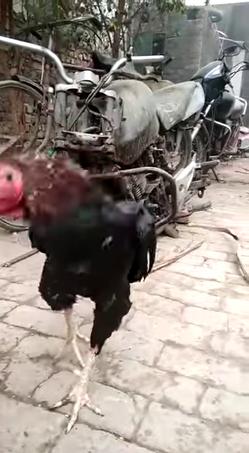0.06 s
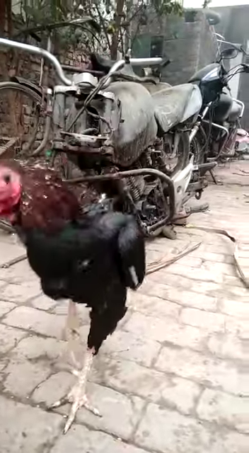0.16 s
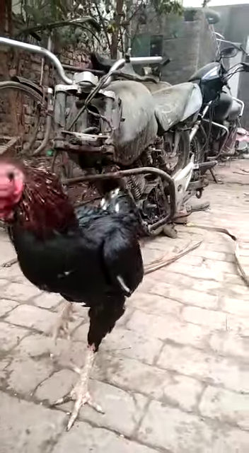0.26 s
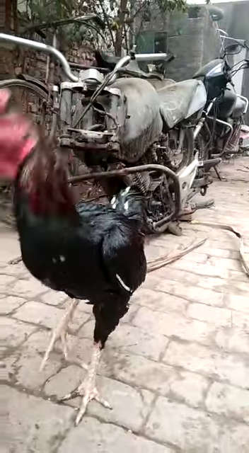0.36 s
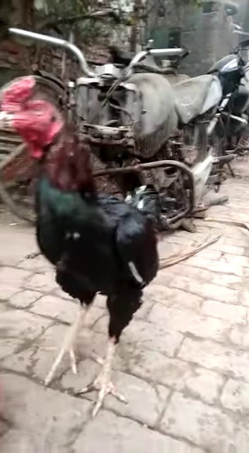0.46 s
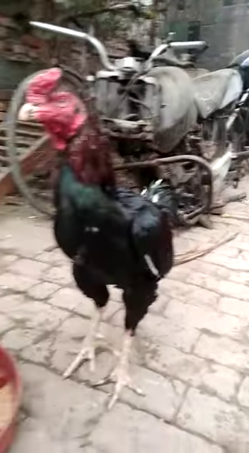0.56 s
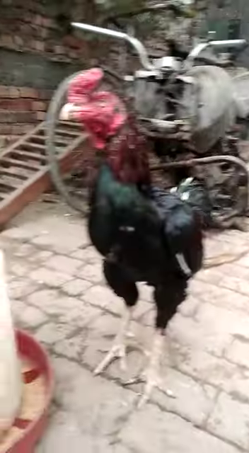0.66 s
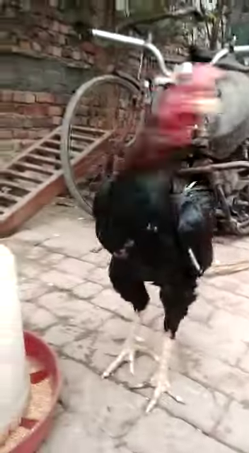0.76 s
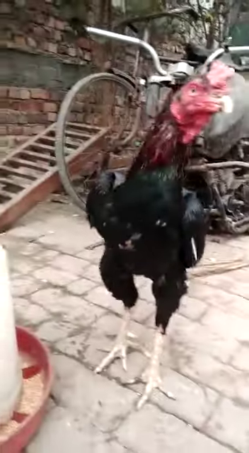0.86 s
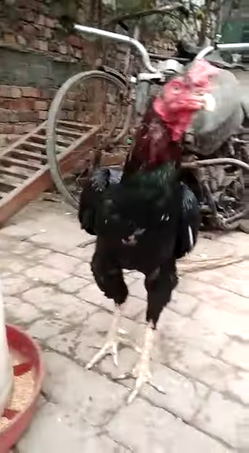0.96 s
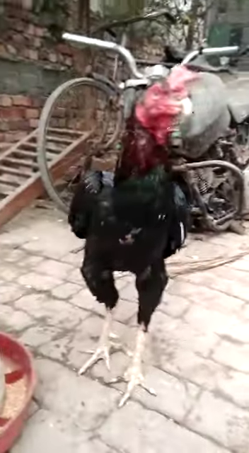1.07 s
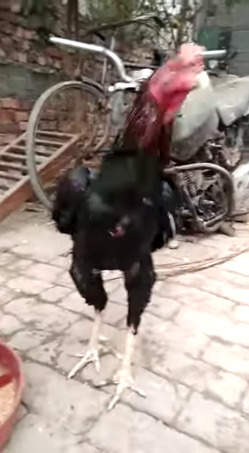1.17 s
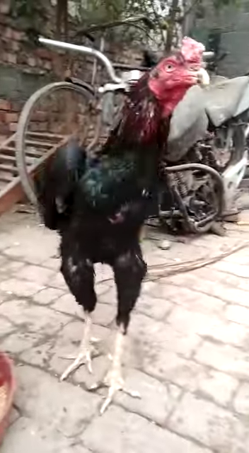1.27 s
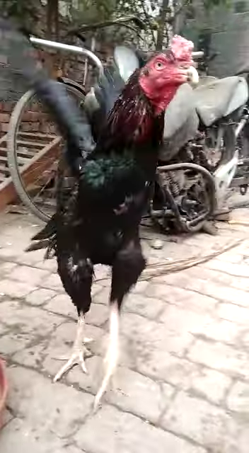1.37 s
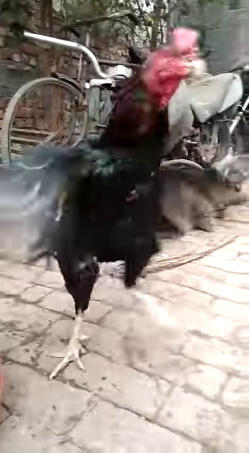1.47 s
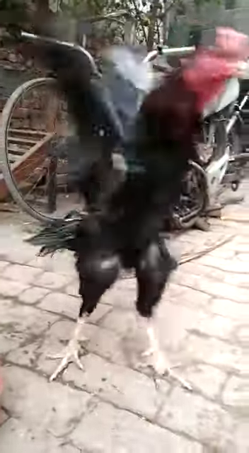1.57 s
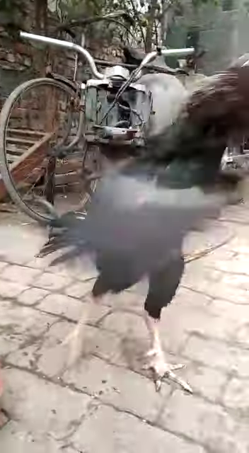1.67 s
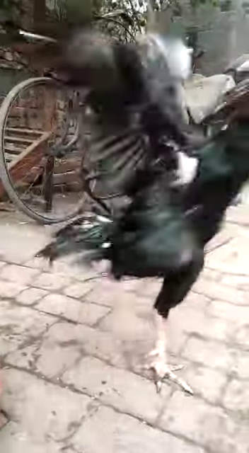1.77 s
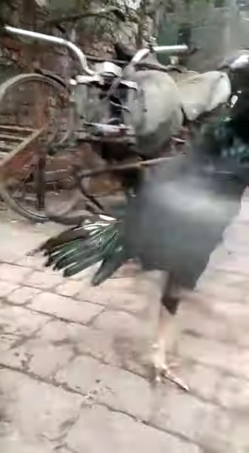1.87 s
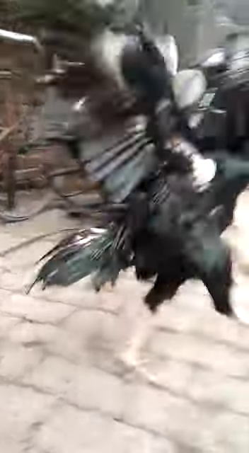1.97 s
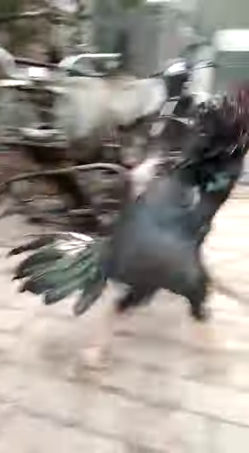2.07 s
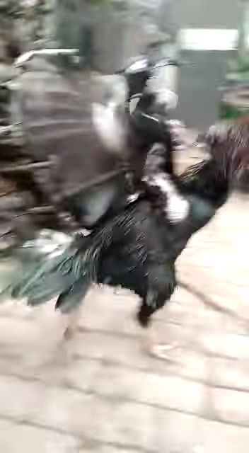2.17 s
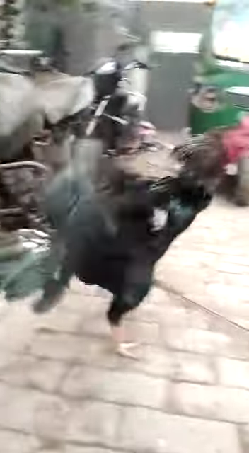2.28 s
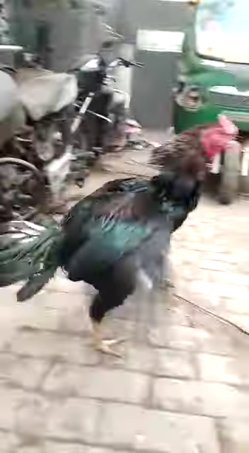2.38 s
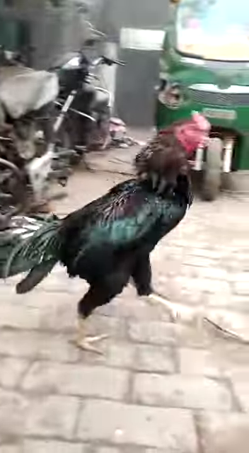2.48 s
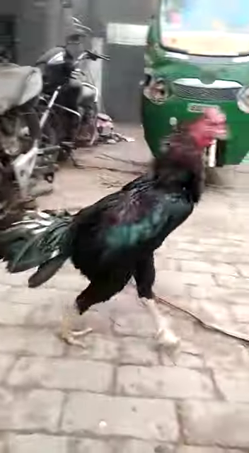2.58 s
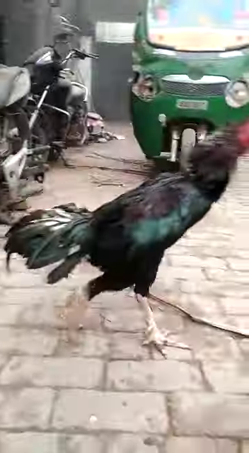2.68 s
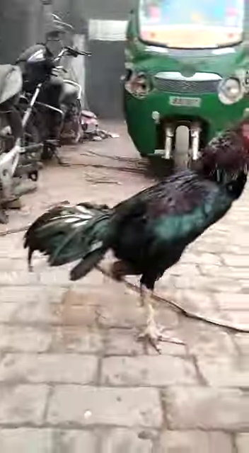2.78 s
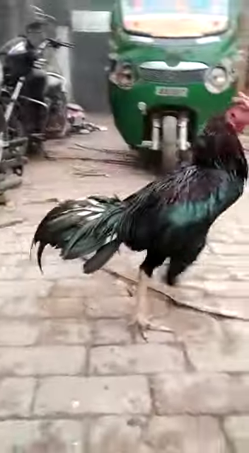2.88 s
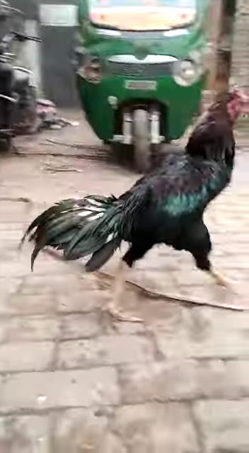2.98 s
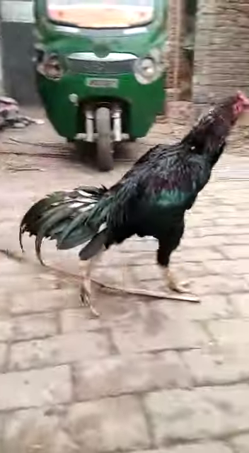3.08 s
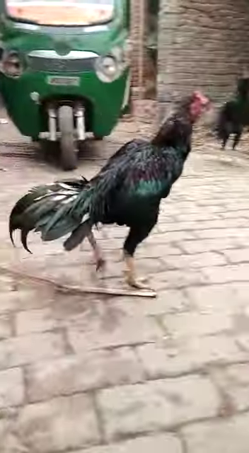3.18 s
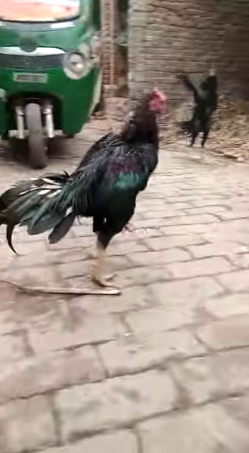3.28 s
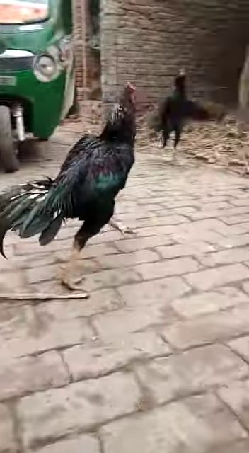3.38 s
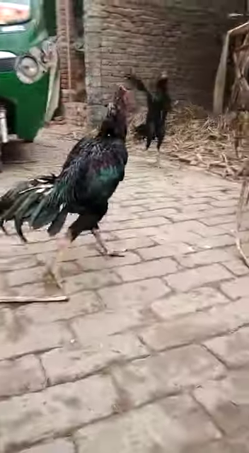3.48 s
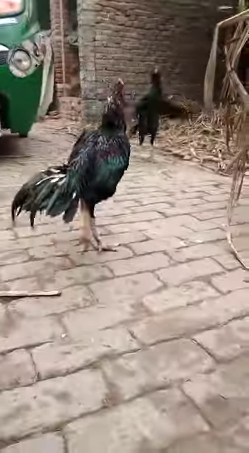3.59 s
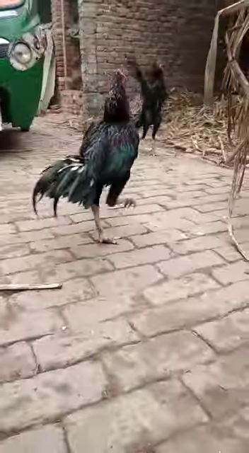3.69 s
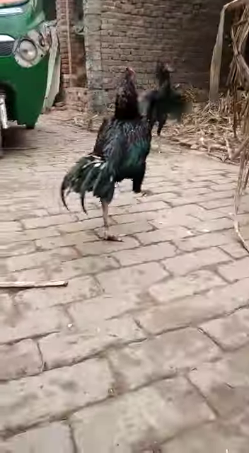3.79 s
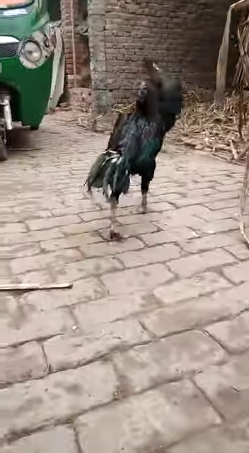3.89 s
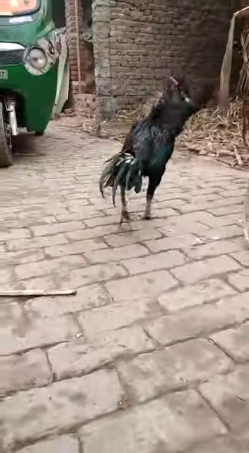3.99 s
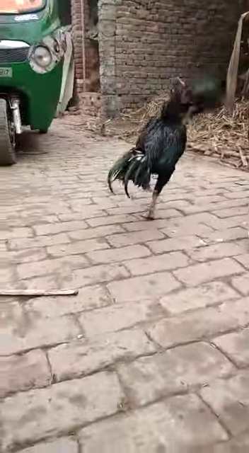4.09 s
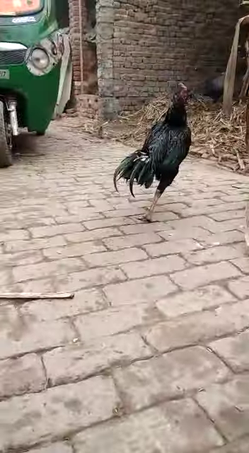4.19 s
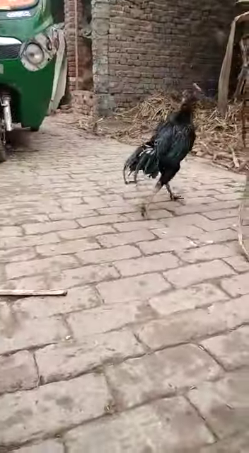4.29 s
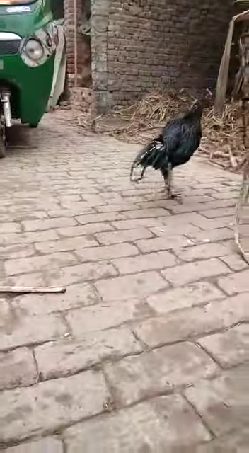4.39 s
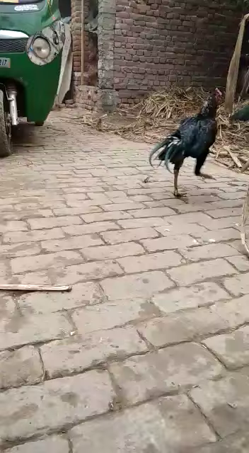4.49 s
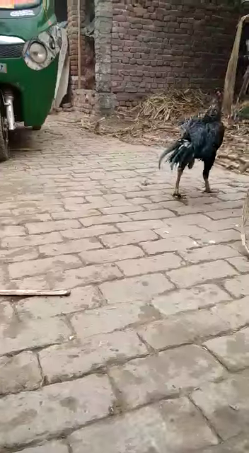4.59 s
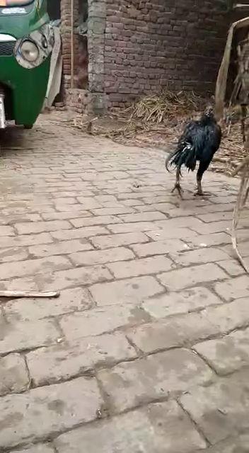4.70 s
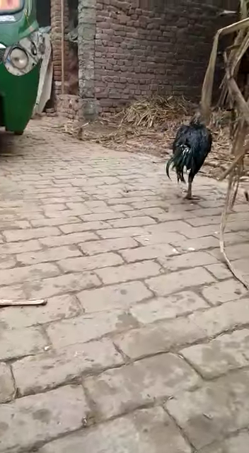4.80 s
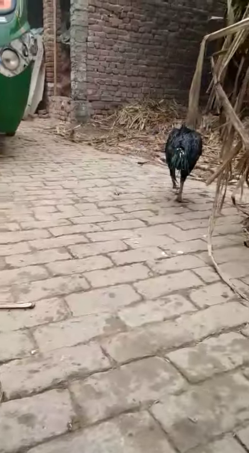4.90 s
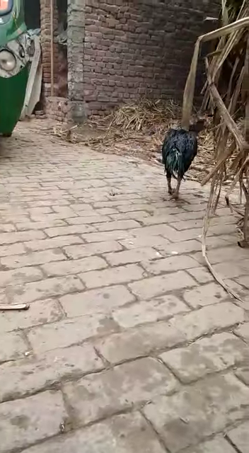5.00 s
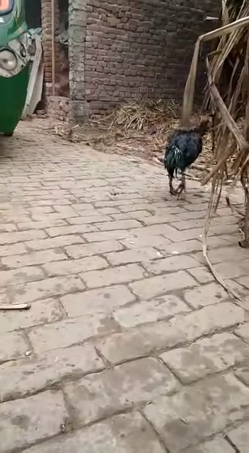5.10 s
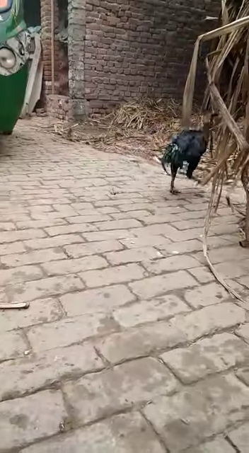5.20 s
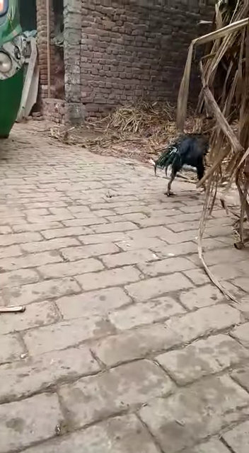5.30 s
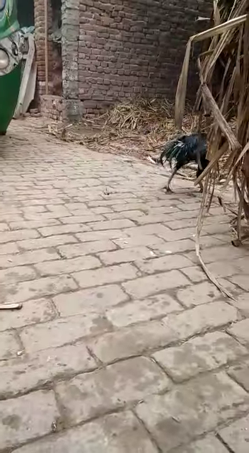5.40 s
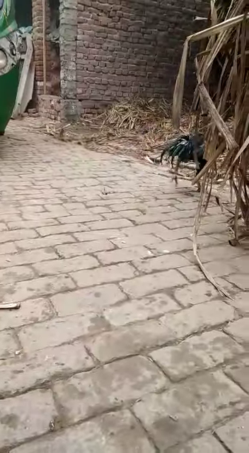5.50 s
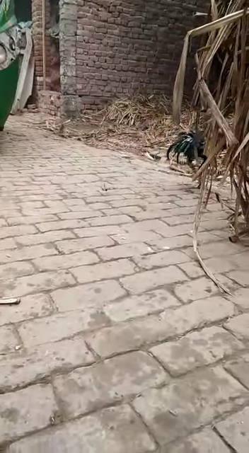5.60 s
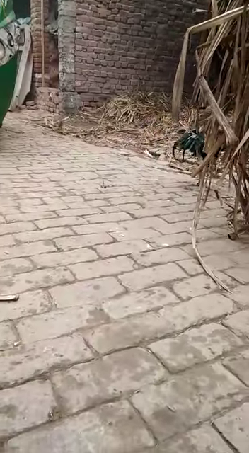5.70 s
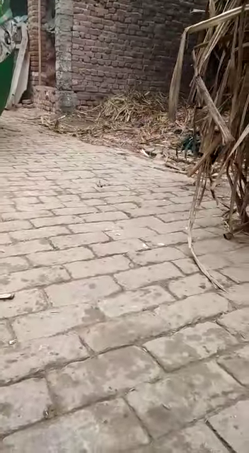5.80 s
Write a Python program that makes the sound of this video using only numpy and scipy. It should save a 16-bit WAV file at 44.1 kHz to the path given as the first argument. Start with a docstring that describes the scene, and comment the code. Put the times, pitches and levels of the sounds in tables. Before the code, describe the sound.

Close snap and knock, feathery wing flaps, a bright metallic jingle, running scuffs and a dry leafy crunch as a rooster crosses a village lane.

```python
"""A rooster struts on brick in a village lane; dust and plumage rustle throughout, over a low distant hum.
First claws tick, metal jingles, a low cluck sounds, and a hard snap and a soft knock fall close by.
The rooster beats its wings and clucks again; a second bird flaps more softly, and the metal jingles hardest.
Then feet run off over the grit, crushing a stalk; a last, louder cluck precedes the crunch of dry leaves.
Strokes are shaped noise, contacts are struck resonators, clucks are harmonics under throat resonances."""
import sys
import numpy as np
from scipy import signal
from scipy.fft import rfft, irfft, next_fast_len
from scipy.io import wavfile

SR = 44100
rng = np.random.default_rng(int(sys.argv[2]) if len(sys.argv) > 2 else 0)


def master_out(mix):
    """Clip the mix to full scale and print it as 16-bit PCM to the path in sys.argv[1]."""
    frames = np.transpose(np.atleast_2d(mix))
    ceiling = np.clip(frames, -1, 1)
    pcm = np.round(ceiling * 32767).astype(np.int16)
    wavfile.write(sys.argv[1], SR, pcm)


N = 257720
TIME = np.arange(N) / SR

# wing beats: start of decay_s, swell_s, relative levels of air puff_db, slap_db and feather clap_db
WINGBEATS = [(1.356, .011, -77, -51, -50), (1.691, 0.014, -44, -43.5, -33),
             (1.877, 0.0054, -46, -35, -21.5), (2.04, 0.021, -53, -53.5, -46),
             (2.094, 0.0073, -40, -35, -25.5), (2.317, .008, -42.5, -43.5, -35),
             (3.366, .018, -46, -46.5, -39), (3.577, 0.033, -45.5, -46.5, -48),
             (3.787, 0.038, -50, -48.5, -46)]
# spectrum of the low thud in every kind of stroke: frequency_hz, relative density_db (per Hz)
THUD = [(40, -28.5), (90, -4), (160, -2), (300, -3.5), (500, -3.5), (1000, -48)]
# spectrum of a foot or plumage scraping: frequency_hz, relative density_db (per Hz)
SCRAPE = [(150, -27), (350, -1), (600, 0.5), (900, -4.5), (1400, -4), (2000, -11), (3200, -28.5)]


def from_db(db):
    """Amplitude ratio: 20 dB for each factor of ten."""
    return 10 ** (np.asarray(db) / 20)


def on_grid(points, size):
    """Interpolation over log frequency, read at the bins of an FFT."""
    hz, value = np.transpose(points)
    bin_hz = np.arange(size // 2 + 1) * SR / size
    return np.interp(np.log(bin_hz + 1), np.log(hz), value)


def colour(x, spectrum, keep_power=True):
    """Minimum-phase filtering: the folded cepstrum of a gain curve gives its causal response."""
    size = next_fast_len(N + 8192) * 2
    if keep_power:
        # fall by 30 dB in the octave beyond either end
        (low_hz, low_db), (high_hz, high_db) = spectrum[0], spectrum[-1]
        spectrum = [(low_hz / 2, low_db - 30), *spectrum, (high_hz * 2, high_db - 30)]
    gain = from_db(on_grid(spectrum, size))
    if keep_power:
        gain = gain / np.sqrt(np.mean(gain ** 2))   # white noise keeps its power
    cepstrum = irfft(np.log(gain))
    cepstrum[1:size // 2] *= 2
    cepstrum[size // 2 + 1:] = 0
    return irfft(rfft(x, size) * np.exp(rfft(cepstrum)))[..., :N]


def friction(grain_share=0., per_s=1000.):
    """Friction as smooth noise plus random micro-impacts, with interchannel coherence set by frequency."""
    # frequency_hz, left-right correlation (0 to 1)
    likeness = [(100, 0.93), (250, 0.91), (700, 0.95), (1500, 0.22), (3000, 0), (14000, 0)]
    clicks = (rng.random((2, N)) < per_s / SR) * rng.standard_normal((2, N))
    smooth = np.sqrt(1 - grain_share) * rng.standard_normal((2, N))
    grains = np.sqrt(grain_share) * clicks / clicks.std()
    mid, side = rfft(smooth + grains)
    alike = on_grid(likeness, N)
    stereo = np.sqrt(1 + alike) * mid + np.sqrt(1 - alike) * side * [[1], [-1]]
    return irfft(stereo, N) / np.sqrt(2)


def flutter(per_s, depth_db):
    """Random amplitude modulation: a gain interpolated between normal draws in decibels."""
    knots = np.arange(0, N / SR + 1, 1 / per_s)
    return from_db(depth_db * np.interp(TIME, knots, rng.standard_normal(len(knots))))


def swell(s, rise, decay):
    """Exponential growth up to the moment s, then exponential decay (time constants in s)."""
    exponent = np.maximum((s - TIME) / rise, (TIME - s) / decay)
    return np.exp(-np.minimum(exponent, 20))


def impulse(s):
    """Unit impulse, the idealised contact force."""
    return 1. * (np.arange(N) == round(s * SR))


def ring(clicks, hz, t60):
    """Damped resonator: a unit impulse starts a decaying sine that falls 60 dB in t60 seconds."""
    radius = from_db(-60 / (t60 * SR))
    angle = 2 * np.pi * hz / SR
    feedback = [1, -2 * radius * np.cos(angle), radius ** 2]
    return signal.lfilter([0, np.sin(angle)], feedback, clicks + 1e-18)


def between(low_db, high_db, share):
    """Linear interpolation in decibels from the high band's level towards the low band's."""
    return high_db + share * (low_db - high_db)


def high_pass(x, hz, order):
    """Butterworth high-pass: the deep low end below the given frequency is taken away."""
    return signal.sosfilt(signal.butter(order, hz, "high", fs=SR, output="sos"), x)


def strokes(table, spectra, grain_share, per_s, flutter_db):
    """Power addition of overlapping strokes, each driving low, middle and high bands of grainy friction."""
    shapes = np.array([swell(*row[:3]) for row in table])
    gains = from_db(np.array(table)[:, 3:].T)
    envelopes = np.sqrt(gains ** 2 @ shapes ** 2) * flutter(300, flutter_db)
    return sum(colour(envelope * friction(grain_share, per_s), spectrum)
               for envelope, spectrum in zip(envelopes, spectra))


def wing_strokes():
    """Aerodynamic and frictional noise: each beat pushes a puff of air, slaps and hisses through feathers."""
    # frequency_hz, relative density_db (per Hz)
    slap_spectrum = [(150, -32.5), (350, -5), (550, 0.5), (720, -3), (1050, -5.5), (1500, -5), (2100, -16),
                     (3200, -27)]
    # frequency_hz, relative density_db (per Hz)
    hiss_spectrum = [(1200, -20), (2200, 1.5), (3200, -3.5), (4400, -0.5), (7000, -4), (10000, -2.5),
                     (14000, -15.5)]
    hiss_offset_db = -.5   # feather hiss against slap
    rows = []
    for s, rise, puff_db, slap_db, _ in WINGBEATS:
        decay = .015 + 0.84 * rise   # a slower beat also dies away more slowly
        rows.append((s, rise, decay, puff_db, slap_db, slap_db + hiss_offset_db))
    return strokes(rows, (THUD, slap_spectrum, hiss_spectrum), grain_share=0.5, per_s=1500, flutter_db=1.7)


def wing_claps():
    """Impact excitation of modes: the stiff feathers of both wings clap at the height of a beat."""
    # frequency_hz, relative level_db, t60_s
    feather_modes = [(690, 0, .026), (1050, -6, .016), (1480, -10, .014), (2330, -4, 0.015)]
    lead_s, lead_db = .0055, -8.5   # one wing claps earlier and more softly
    force = np.zeros(N)
    for s, *_, clap_db in WINGBEATS:
        pair = impulse(s) + from_db(lead_db) * impulse(s - lead_s)
        force += from_db(clap_db) * pair
    return sum(from_db(db) * ring(force, hz, t60) for hz, db, t60 in feather_modes)


def scuffs():
    """Sliding friction: a foot thuds down, scrapes and drags grit over the brick."""
    # start of decay_s, swell_s, relative thud_db, relative grit_db
    steps = [(.315, .008, -60, -62), (0.47, .002, -85, -53.5), (.585, 0.032, -59.5, -53),
             (2.239, 0.0065, -68, -46), (2.874, 0.0098, -61, -54), (3.969, .014, -46, -51.5),
             (4.107, 0.019, -45, -46.5), (4.209, .003, -47, -43.5), (4.255, .025, -52, -53),
             (4.353, .018, -48.5, -42), (4.529, 0.008, -46, -43), (4.637, .004, -60, -51),
             (4.815, 0.028, -66, -46.5), (5.19, .018, -60, -55), (5.253, 0.0072, -53.5, -43.5)]
    # frequency_hz, relative density_db (per Hz)
    grit_spectrum = [(1100, -14), (2100, -1.5), (3200, -3), (4400, -3), (7000, -4), (10000, -1.5),
                     (14000, -15.5)]
    decay_s, thud_share, scrape_offset_db = 0.039, 0.4, -1.8
    rows = []
    for s, rise, thud_db, grit_db in steps:
        scrape_db = between(thud_db, grit_db, thud_share) + scrape_offset_db
        rows.append((s, rise, decay_s, thud_db, scrape_db, grit_db))
    return strokes(rows, (THUD, SCRAPE, grit_spectrum), grain_share=0.24, per_s=2200, flutter_db=1.3)


def ticks():
    """Damped resonance: claws, landing feet and a cracking stalk ring at a pitch and one overtone."""
    # start_s, relative level_db, pitch_hz, overtone_db (against the pitch)
    contacts = [(0.2997, -37, 1140, -12.5), (.468, -45, 2920, -12), (1.277, -48, 695, -12),
                (1.340, -43, 1230, -9), (2.215, -40.5, 810, -12), (2.243, -39, 3770, -8),
                (2.53, -40, 1110, -3), (2.699, -45.5, 1200, -12), (2.786, -44, 6550, -14),
                (2.812, -44, 6000, -12), (3.105, -48, 3000, 0), (3.752, -40, 646, -13),
                (3.967, -36, 400, -14), (4.112, -33.5, 255, -6), (4.209, -38, 300, -1),
                (4.25, -34.5, 139, -14), (4.347, -40, 269, 2.5), (4.382, -37, 273, -9),
                (4.4895, -27, 1035, 3)]
    decay_cycles = 12.8   # cycles of the pitch in which both partials fall 60 dB
    overtone_ratio = 2.23
    out = np.zeros(N)
    for s, db, hz, overtone_db in contacts:
        click, t60 = impulse(s), decay_cycles / hz
        out += from_db(db) * ring(click, hz, t60)
        out += from_db(db + overtone_db) * ring(click, overtone_ratio * hz, t60)
    return out


def shuffle(low_db, middle_db, hiss_db):
    """Continuous friction of plumage and dust, swelling with the wing flapping and again with the run."""
    # time_s, relative low rustle_db, relative hiss_db
    motion = [(0, -68.5, -70.5), (.4, -68, -71), (.75, -70.5, -63.5), (1.1, -73.5, -72), (1.35, -70.5, -66),
              (1.68, -54, -55.5), (1.99, -54.5, -57.5), (2.39, -64.5, -46.5), (2.72, -66.5, -61.5),
              (3.0, -72, -66), (3.5, -67, -65), (3.88, -63.5, -55), (4.25, -53.5, -57),
              (4.45, -54.5, -54.5), (4.62, -58, -49), (4.95, -63, -59), (5.56, -71, -69), (5.84, -63, -73)]
    # frequency_hz, relative density_db (per Hz)
    hiss_spectrum = [(1000, -19.5), (2200, -1), (4000, -3), (7000, -1.5), (10000, -0.5), (14000, -13.5)]
    s, *levels = np.transpose(motion)
    low, hiss = (np.interp(TIME, s, level) for level in levels)
    middle = between(low, hiss, 0.45)
    bands = (low + low_db, middle + middle_db, hiss + hiss_db)
    unrest = flutter(45, 2.38)   # shared by all bands
    return sum(colour(unrest * from_db(level) * friction(0.33, 2500), spectrum)
               for level, spectrum in zip(bands, (THUD, SCRAPE, hiss_spectrum)))


def snaps():
    """Contact hardness sets bandwidth: a hard snap, then a soft knock, excite the same modes."""
    # start_s, relative level_db, contact cut-off_hz
    contacts = [(0.7166, -5, 7000), (0.7602, -7, 620)]
    # frequency_hz, relative left level_db, t60_s, right_db (against left)
    body_modes = [(460, -27.5, 0.023, -3), (850, -24.5, 0.017, -0.5), (1900, -18.5, 0.0081, -13),
                  (2310, -9.5, 0.0045, -30), (3600, -8, 0.0017, -22), (5600, -27, 0.0028, -16),
                  (574, -47.5, 0.33, 7.5)]
    force = np.zeros(N)
    for s, db, cutoff_hz in contacts:
        softness = signal.butter(3, cutoff_hz, fs=SR, output="sos")
        force += from_db(db) * signal.sosfilt(softness, impulse(s) + 1e-18)
    rings = sum(from_db([[db], [db + right_db]]) * ring(force, hz, t60)
                for hz, db, t60, right_db in body_modes)
    return high_pass(rings, 380, order=3)


def jingle(ring_db, spread_db, clash_db, t60, clash_s):
    """Modal excitation: each touch rings the metal with new mode strengths; hard touches also clash."""
    # start_s, relative level_db
    touches = [(0.289, -30), (1.43, -25.5), (2.92, -37), (2.946, -28.5), (3.70, -28), (3.8232, 0),
               (3.825, -12), (3.834, -4.5), (3.841, -6), (3.8445, -1.5), (3.846, -3), (3.864, -15),
               (4.98, -23)]
    # frequency_hz, relative level_db
    metal_modes = [(2530, -13), (2628, -1), (2907, -6), (4334, -9), (4737, -17), (5846, 0), (6374, -1),
                   (7547, 3), (7684, -8), (7870, 3), (7909, -11), (8260, -8), (8352, 9), (8620, 5),
                   (9240, -2), (9700, -8), (10110, -12), (10665, -18), (10716, -6), (10847, -18),
                   (11830, -10), (13598, -10)]
    # frequency_hz, relative density_db (per Hz)
    clash_spectrum = [(1500, -24), (2100, -14), (2650, -3.5), (3400, -13), (5800, -7.5), (7000, -8.5),
                      (7900, 5), (10500, 0.5), (12500, -9.5), (14000, -19)]
    at = [round(s * SR) for s, db in touches]
    force = from_db([db for s, db in touches])
    shape = (2, len(at))
    out = np.zeros((2, N))
    for hz, db in metal_modes:
        strength = from_db(db + ring_db + spread_db * rng.standard_normal(shape))
        clicks = np.zeros((2, N))
        clicks[:, at] = force * strength * rng.choice([-1, 1], shape)
        out += ring(clicks, hz, t60)
    # the clash grows faster than the force of the touch
    clash_power = sum((from_db(1.41 * db + clash_db) * swell(s, 0.00015, clash_s)) ** 2
                      for s, db in touches)
    return out + colour(np.sqrt(clash_power) * friction(0.31, 2500), clash_spectrum)


def clucks(opening_s, jitter_db, rasp_db, count=9):
    """Source and filter: harmonics of the syrinx under throat resonances that rise as the beak opens."""
    # loudest moment_s, swell_s, decay_s, mean pitch_hz, relative level_db, resonance rise_octaves
    calls = [(.556, 0.022, 0.033, 282.8, -53, 0.39), (2.778, .024, 0.05, 370.3, -52, 0.7),
             (5.025, .015, 0.016, 295, -40, 0.56)]
    # frequency_hz, relative level_db
    throat = [(280, -4.5), (590, 2), (880, -7.5), (1200, -22), (1700, -25), (2350, -29), (3000, -40)]
    t, out = TIME[:SR // 5], np.zeros(N + SR)
    rasp = colour(rng.standard_normal(N), throat)
    rough_pitch, rough_level = flutter(350, jitter_db), flutter(300, 0.62)
    for s, rise, decay, pitch, db, octaves in calls:
        start = round((s - 1.3 * rise) * SR)
        span = slice(start, start + len(t))
        hz = pitch * rough_pitch[span]
        phase = 2 * np.pi * np.cumsum(hz) / SR
        opening = np.clip((TIME[span] - s) / opening_s, 0, 1)
        # reading the throat curve lower down moves its resonances up
        place = hz / 2 ** (octaves * opening)
        voice = sum(from_db(np.interp(k * place, *np.transpose(throat))) * np.cos(k * phase)
                    for k in range(1, count + 1))
        voice = voice + from_db(rasp_db) * rasp[span] * (1 + np.cos(phase))   # air in each open phase
        envelope = (rough_level * swell(s, rise, decay))[span] * np.minimum(t / 0.0037, 1)
        out[span] += voice * from_db(db) * envelope
    return out[:N]


def leaves():
    """Brittle fracture: dry leaves and stalks crackle, with a weaker crunch and thud beneath."""
    # start of decay_s, swell_s, decay_s, relative crackle_db
    crushes = [(4.492, .0007, 0.013, -31), (5.638, .0009, .01, -48.5), (5.649, 0.0034, 0.034, -34.5),
               (5.761, 0.0059, 0.01, -37.5), (5.773, 0.002, 0.03, -33), (5.808, .016, 0.024, -38)]
    # frequency_hz, relative density_db (per Hz)
    crunch_spectrum = [(200, -23), (500, 4.5), (1000, -2), (1800, 2), (3000, -25)]
    # frequency_hz, relative density_db (per Hz)
    crackle_spectrum = [(1200, -12), (2300, -1), (3200, -0.5), (4400, -2.5), (7000, -1.5), (10000, 0.5),
                        (14000, -13.5)]
    thud_offset_db, crunch_offset_db = -24.5, -11.5   # against the crackle
    rows = [(s, rise, decay, db + thud_offset_db, db + crunch_offset_db, db)
            for s, rise, decay, db in crushes]
    return strokes(rows, (THUD, crunch_spectrum, crackle_spectrum),
                   grain_share=0.42, per_s=3000, flutter_db=1.5)


def village_hum():
    """Stationary coloured noise: the distant hum of the village."""
    # frequency_hz, relative density_db (per Hz)
    hum_spectrum = [(18, -64), (30, -34), (106, 3), (274, -12.5), (336, -13.5), (413, -15), (458, -15.5),
                    (827, -17.5), (1490, -19), (1790, -19.5), (2040, -23.5), (4750, -37), (5270, -41),
                    (8370, -27.5), (14000, -32.5)]
    return from_db(-61) * colour(friction(), hum_spectrum)


def paving(x, lag_s, wander_db, echo_db):
    """Comb filtering: the bricks mirror each rustle with a short delay that wanders at random."""
    echo_gain = from_db(echo_db)
    ears = []
    for ear in x:
        delayed = np.interp(TIME - lag_s * flutter(7, wander_db), TIME, ear)
        ears.append(ear + echo_gain * delayed)
    return np.array(ears) / np.hypot(1, echo_gain)


def walls(x, wet_db, t60):
    """Diffuse reverberation: brick walls scatter a decaying noise tail, different in each ear."""
    t = TIME[:SR // 2]
    decay = from_db(-60 * t / t60)
    build_up = 1 - np.exp(-t / 0.0073)
    tail = rng.standard_normal((2, len(t))) * decay * build_up
    tail /= np.sqrt(np.sum(tail ** 2, axis=1, keepdims=True))   # unit energy
    return x + from_db(wet_db) * signal.fftconvolve(x, tail, axes=1)[:, :N]


def scene():
    """Superposition of birds, leaves, metal and snaps between the walls, over the hum."""
    rustle = wing_strokes() + scuffs() + leaves() + shuffle(low_db=-1, middle_db=-1.5, hiss_db=1.08)
    rustle = paving(rustle, lag_s=0.001096, wander_db=3., echo_db=-8.0)
    contacts = high_pass(wing_claps() + ticks(), 143, order=2)
    voices = clucks(opening_s=0.023, jitter_db=.4, rasp_db=-11)
    birds = (contacts + voices) * from_db([[-.5], [0]])   # left, right
    metal = jingle(ring_db=-45.5, spread_db=5.0, clash_db=-23.0, t60=0.18, clash_s=0.01)
    return (walls(rustle, wet_db=-12.0, t60=0.19)
            + walls(birds, wet_db=-13.0, t60=0.22)
            + walls(metal, wet_db=-6.0, t60=0.19)
            + walls(snaps(), wet_db=-28.0, t60=0.46)
            + village_hum())


def record(dry):
    """Transducer response: each microphone colours its side, the right thin in the bass; the top is cut."""
    # frequency_hz, gain_db
    left_mic = [(50, -1), (200, 3.5), (450, 0), (1500, 1), (4550, 5), (4900, -4.5), (7000, -4), (8000, -2),
                (11000, 2), (14000, 0.5)]
    # frequency_hz, gain_db
    right_mic = [(50, -7), (170, -16), (450, -3), (1500, -.5), (4550, 4.5), (4900, 2.5), (7000, -1),
                 (8000, -0.5), (11000, -8), (14000, -2)]
    heard = np.array([colour(x, mic, keep_power=False) for x, mic in zip(dry, (left_mic, right_mic))])
    top_cut = signal.ellip(10, .3, 70, 14500, fs=SR, output="sos")   # low-pass, edge in Hz
    return signal.sosfilt(top_cut, heard)


dry = scene()
out = record(dry)
master_out(out)
```